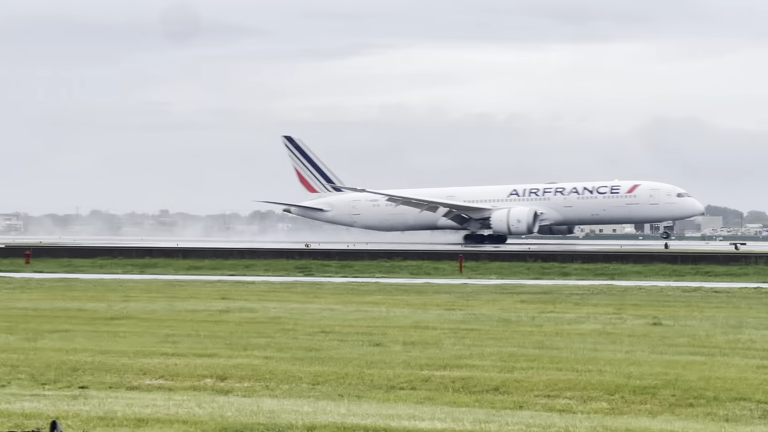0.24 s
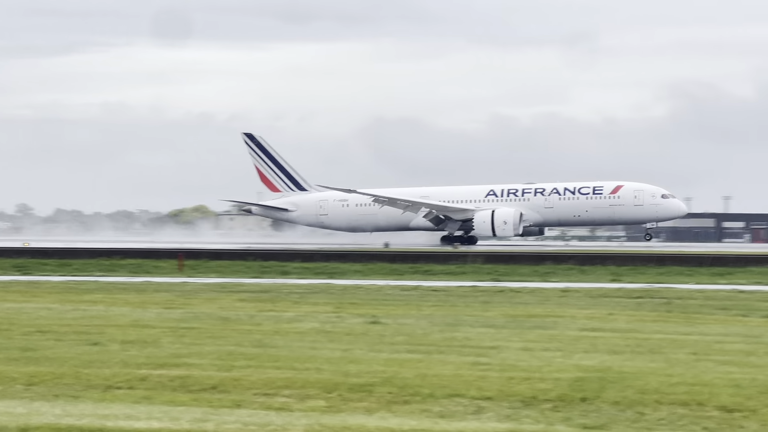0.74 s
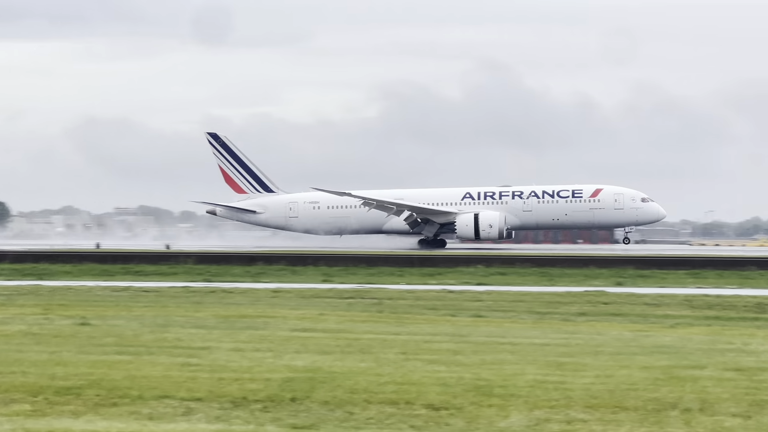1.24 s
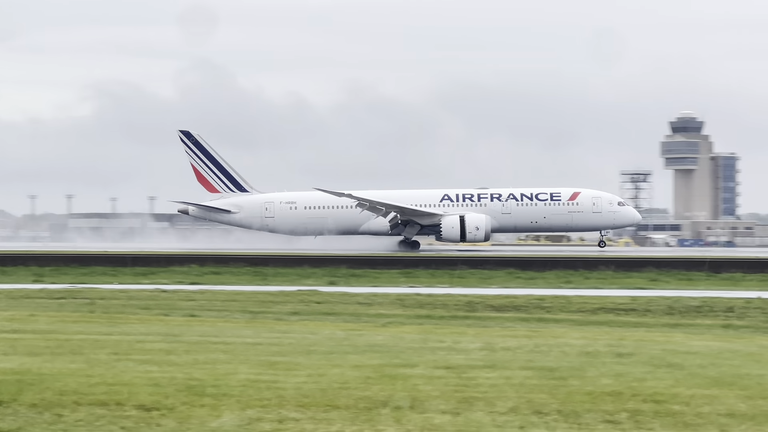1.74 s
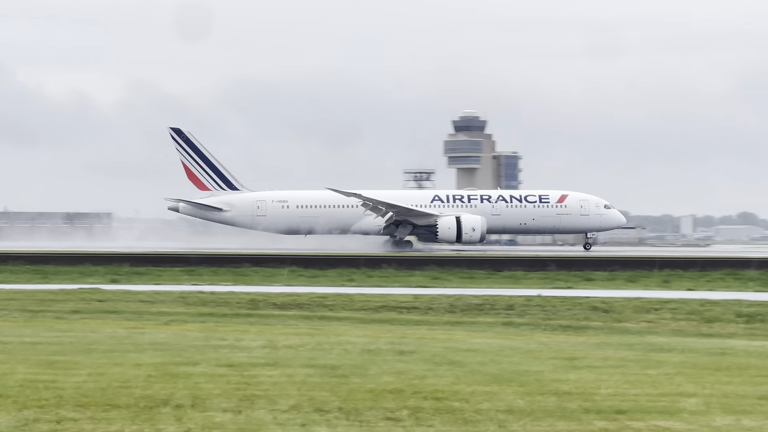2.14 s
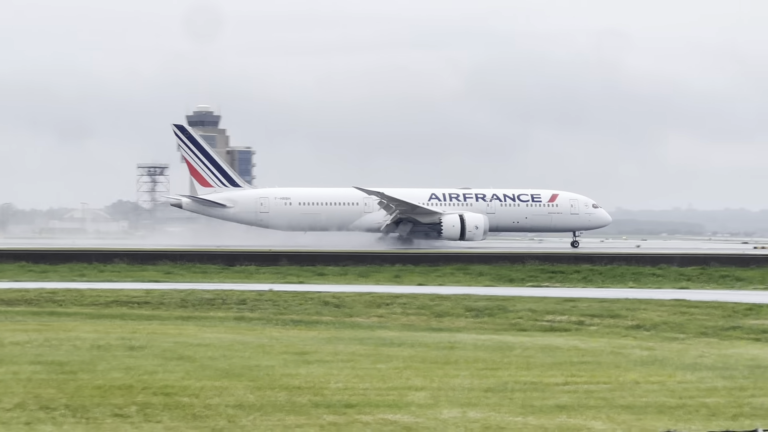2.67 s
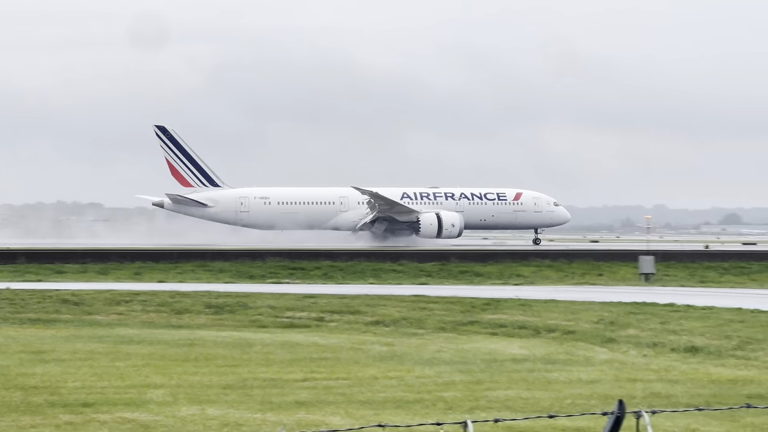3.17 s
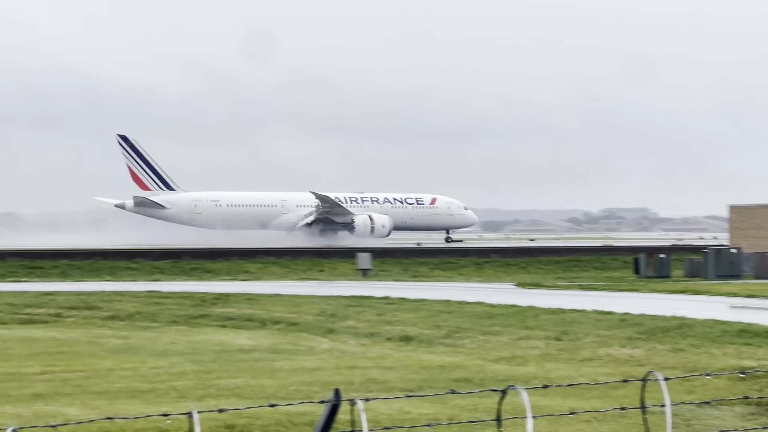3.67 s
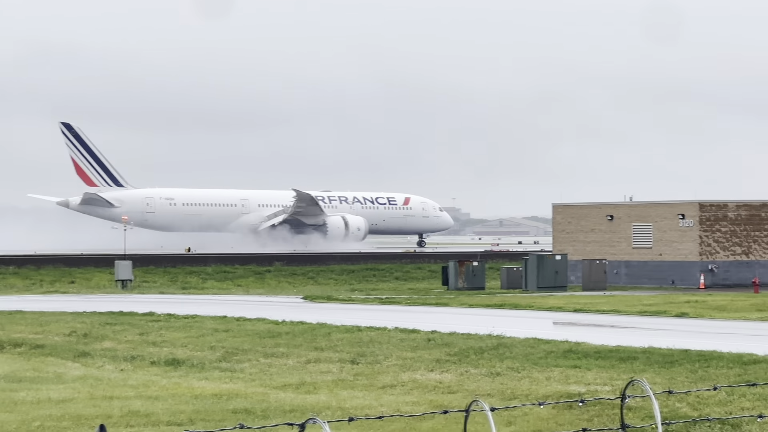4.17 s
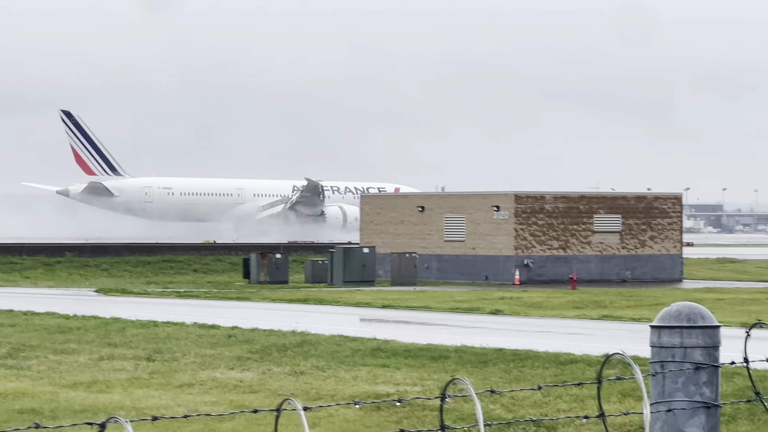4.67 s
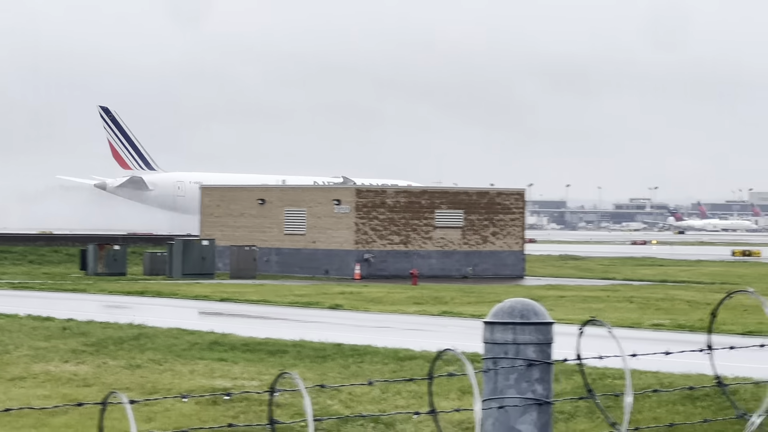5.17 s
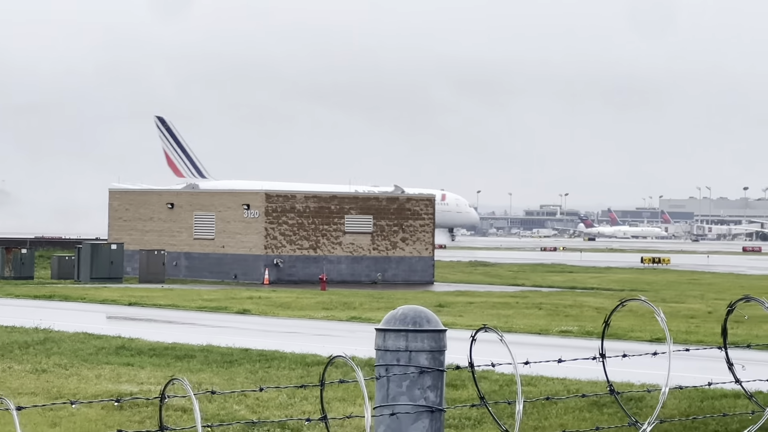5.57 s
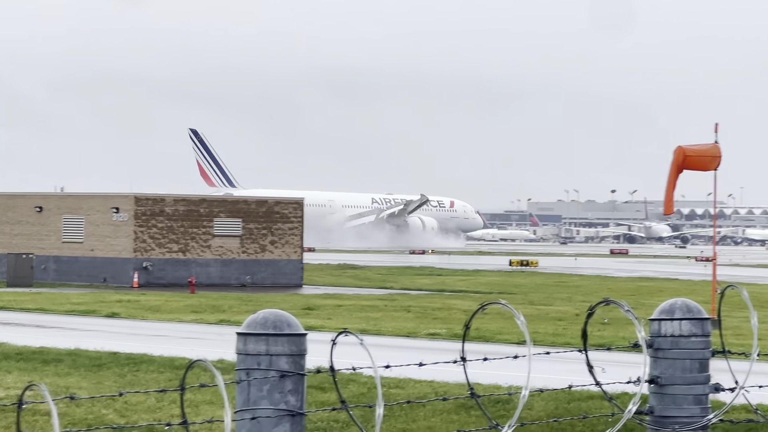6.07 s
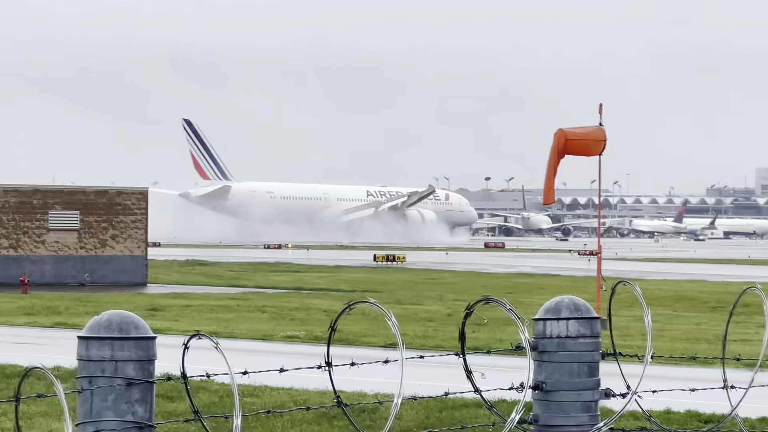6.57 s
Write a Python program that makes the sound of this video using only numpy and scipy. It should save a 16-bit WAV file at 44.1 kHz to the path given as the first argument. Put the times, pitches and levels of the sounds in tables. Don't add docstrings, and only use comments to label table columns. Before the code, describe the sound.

A large jet rolls out on a wet runway, heard across open grass by a camera in light rain. From 0 s a deep, heaving exhaust rumble and drone dominate, with a weaker roar and thin spray hiss fluttering in the air. Between 0.1 and 0.7 s a sleeve softly rubs the camera, hollow with a slight swish. Fine rain patters very quietly, with small sharp drop ticks, clearest near 0.2, 1.6 and 3.5 s. The engine dips around 1 s, then from about 2 s reverse thrust climbs quickly, becoming a broad, rough roar with brighter hiss by 3 s. It stays massive through 4 s and peaks near 5 s. A faint, wavering fan tone enters around 4.5 s. After 5.3 s the roar eases unevenly, the rain patter thins, and rumbling jet noise continues to the end at about 7 s.

```python
import sys
import numpy as np
from scipy import signal
from scipy.io import wavfile
from scipy.ndimage import uniform_filter1d

SR = 44100
rng = np.random.default_rng(int(sys.argv[2]) if len(sys.argv) > 2 else 0)


def level_to_linear(level):
    exponent = np.asarray(level, float) / 20
    return 10 ** exponent


def generate_wav(signal):
    frames = np.transpose(np.atleast_2d(signal))
    scaled = np.clip(frames, -1, 1) * 32767
    pcm = np.round(scaled).astype(np.int16)
    wavfile.write(sys.argv[1], SR, pcm)


N = 300762
SIZE, HOP = 2048, 256
HZ = np.fft.rfftfreq(SIZE, 1 / SR)
TIMES = np.arange(N // HOP + 5) * HOP / SR
CLOCK = np.arange(N) / SR
ABEAM_S = 3.92

# start_s, reverser_flow_db (below full), core_exhaust_db (below full),
# reverser_open (0 to 1)
THRUST = [(0, -23.5, -6, .6), (.45, -20.5, -7.5, 0), (.98, -15.5, -10, 0.4), (1.07, -15, -4.5, 0.4),
          (1.5, -16.5, -4, .5), (1.85, -16, -3, .7), (2.15, -9.5, -3.5, 0.7), (2.75, -5.5, -2, 0.79),
          (3.3, -2, 2.5, 0.89), (3.5, -1.5, 0, 0.9), (4.1, -1, 0.5, 0.85), (4.6, -0.5, 2, .8),
          (4.95, 1.5, 0.5, .9), (5.3, -1.5, -6.5, 0.8), (5.6, -3.5, -4.5, 1), (6.0, -6.5, -2, 0.4),
          (6.3, -4.5, -3.5, 0.3), (6.82, -7.5, -2.5, 0.3)]
# middle_s, length_s, roar_db, hiss_db
GUSTS = [(0.191, 0.078, 0, 6), (.4, .12, 0.2, -2), (0.692, 0.078, 0, 2.5), (.8, .1, 1.2, -2.5),
         (0.958, 0.045, 4, 2), (1.123, 0.12, 1, 2.5), (1.38, .1, 1.5, 3), (1.7, .3, -1, 1),
         (2.02, 0.14, 0.5, 2), (2.18, .18, 0.1, 2.5), (2.557, 0.25, -0.1, 2.5), (2.76, 0.11, -3, -1),
         (2.925, 0.19, 1.5, 1.5), (3.272, 0.14, 2.2, 3.5), (4.061, .1, -1.5, -1.5), (4.25, 0.22, 0.6, -0.2),
         (4.606, .1, 1.9, 1.5), (5.1, 0.7, 0.5, -0.9), (5.286, .08, 1.8, -1), (5.396, 0.087, .1, 1.5),
         (6.35, 0.37, -1.2, .7)]


def evened(x):
    return x / np.sqrt(np.mean(abs(x) ** 2) + 1e-30)


def read(points, hz):
    point_hz, value = np.transpose(points)
    return np.interp(np.log(hz + 1), np.log(point_hz + 1), value)


def follow(rows, column, t):
    return np.interp(t, [row[0] for row in rows], [row[column] for row in rows])


def bumps(rows, column, t):
    return sum(row[column] * np.exp(-(2 * (t - row[0]) / row[1]) ** 2) for row in rows)


def band(x, low_hz, high_hz):
    return signal.sosfilt(signal.butter(2, [low_hz, high_hz], "bandpass", fs=SR, output="sos"), x)


def blotches(width_hz, seconds):
    field = rng.standard_normal((len(TIMES), len(HZ)))
    field = uniform_filter1d(field, max(1, round(seconds * SR / HOP)), 0)
    field = uniform_filter1d(field, max(1, round(width_hz * SIZE / SR)), 1)
    return evened(field)


def noise():
    real, imaginary = rng.standard_normal((len(TIMES), len(HZ), 2)).T
    return (real + 1j * imaginary).T


def sound(spectra):
    return signal.istft(np.swapaxes(spectra, -1, -2), nperseg=SIZE, noverlap=SIZE - HOP)[1][..., :N]


def layer_level_db(layer, t):
    # full_thrust_db, reverser_flow_share, exhaust_share, turning_db_per_s (as the tail turns to us)
    layers = [
        (-14.5, 0.01, 1, 0.01),
        (-21, 0.092, 0.22, 0.87),
        (-20, 0.59, .05, 0.2),
        (-23.5, 1, 0.01, -0.01),
    ]
    # middle_s, length_s, rumble_db, drone_db
    heaves = [(.17, 0.069, 1, -0.5), (.72, 0.066, 4.5, 4), (1.21, .1, 0, -4), (1.39, 0.082, -1.5, 3.5),
              (1.8, .12, 2, -8), (2.07, .08, 5, -2), (2.24, .1, -1, -3.5), (2.36, .1, -1.5, 1),
              (2.71, .1, 1.5, -4.5), (3.17, 0.096, -5, -1), (3.28, .1, -0.5, -4), (3.93, 0.086, -2.5, -3),
              (4.03, .08, 1, 2.5), (4.25, 0.18, -3, 1.4), (4.54, 0.09, 2, 1.5), (4.8, 0.12, -2.5, 1.5),
              (5.15, 0.092, -6, 7), (5.24, 0.081, 6, -4.5), (5.39, .1, 3.5, 3), (5.72, 0.034, 3.5, 3),
              (6.2, 0.42, 0.5, -5.5), (6.3, 0.097, 4, -3.8), (6.5, 0.071, -5, -3.7)]
    full_db, flow, exhaust, turning_db = layers[layer]
    swells = heaves if layer < 2 else GUSTS
    swell_db = bumps(swells, column=2 + layer % 2, t=t)
    steady_db = flow * follow(THRUST, column=1, t=t) + exhaust * follow(THRUST, column=2, t=t)
    return full_db + steady_db + turning_db * (t - ABEAM_S) + swell_db


def ground_echo_db(width_octaves):
    dip_hz, turn_s, fall_hz_per_s, rise_hz_per_s = 358, 3.34, 12.7, 22
    dip_db, deepen_db_per_s = -10, -1.04
    falling_hz = fall_hz_per_s * np.maximum(turn_s - TIMES, 0)
    rising_hz = rise_hz_per_s * np.maximum(TIMES - turn_s, 0)
    octaves = np.log2((HZ + 1) / (dip_hz + rising_hz + falling_hz)[:, None])
    clear_s, clear_length_s, clear_db = 3.9, .9, -6.5
    taxiway_db = clear_db * np.exp(-(2 * (TIMES - clear_s) / clear_length_s) ** 2)
    depth_db = dip_db + taxiway_db + deepen_db_per_s * (TIMES - ABEAM_S)
    return depth_db[:, None] * np.exp(-(octaves / width_octaves) ** 2)


def drone_shape_db():
    # pitch_hz, level_db (per Hz)
    drone = [(82, -31.5), (140, -4), (200, -2.5), (264, -2), (316, -5), (390, -15), (550, -26), (920, -120)]
    base_db, per_exhaust, sway_db = -1.3, -.55, -0.9
    sway = evened(uniform_filter1d(rng.standard_normal(len(TIMES)), size=20))
    tilt_db = base_db + per_exhaust * follow(THRUST, column=2, t=TIMES) + sway_db * sway
    return read(drone, HZ) + tilt_db[:, None] * np.log2(np.clip(HZ, 120, 400) / 230)


def roar_shape_db():
    # pitch_hz, level_db (per Hz)
    open_roar = [(220, -31.5), (370, 3.5), (526, -4), (698, -3), (783, -7), (962, 0), (1170, 0.5),
                 (1350, -3), (1510, 0.5), (1830, -8), (2300, -17), (2990, -45), (5060, -120)]
    # pitch_hz, level_db (per Hz)
    shut_roar = [(220, -22.5), (370, -2.5), (542, 4), (650, -1.5), (770, -4.5), (1090, -4), (1300, -6.5),
                 (1490, -9.5), (1800, -12), (2300, -11.5), (2990, -40), (5060, -120)]
    opened = np.clip(follow(THRUST, column=3, t=TIMES), 0, 1)[:, None]
    return opened * read(open_roar, HZ) + (1 - opened) * read(shut_roar, HZ)


def hiss_shape_db():
    # pitch_hz, level_db (per Hz)
    hiss = [(1120, -18), (1900, -5.5), (2240, -5.5), (2560, -0.5), (2790, -2.5), (3100, -1.5), (4450, -9.5),
            (5110, -11), (7650, -24), (8500, -31.5), (9200, -44), (12000, -92.5), (20200, -120)]
    distance_db = 0.78 * (TIMES - ABEAM_S)
    flow_db = 0.19 * follow(THRUST, column=1, t=TIMES)
    gust_db = 0.34 * bumps(GUSTS, column=3, t=TIMES)
    return read(hiss, HZ) - (distance_db - flow_db - gust_db)[:, None] * (HZ / 8000) ** 2


def jet():
    # pitch_hz, level_db (per Hz)
    rumble = [(15, -45.5), (25, -13), (46, -15), (58, 3), (70, 5.5), (85, 2), (120, -1), (150, -7.5),
              (190, -8), (250, -42.5), (420, -120)]
    # pitch_hz, left_minus_right_db
    lean_points = [(60, 0), (130, -.5), (280, -1), (410, 0), (600, -3), (880, -1.5), (1290, -2),
                   (1890, -.5)]
    # pitch_hz, level_db
    diffuse = [(30, -36), (100, -24), (300, -21.5), (700, -15), (1500, -25), (2500, -29), (3600, -33),
               (5000, -53.5), (6600, -52), (7300, -24.5), (9000, 8)]
    dip = level_to_linear(ground_echo_db(width_octaves=0.22))
    shapes_db = (read(rumble, HZ), drone_shape_db(), roar_shape_db(), hiss_shape_db())
    power = 0
    for k, shape_db in enumerate(shapes_db):
        layer = level_to_linear(shape_db) * dip
        layer = layer / np.sqrt((layer ** 2).sum(1, keepdims=True))
        power = power + (layer * level_to_linear(layer_level_db(k, TIMES))[:, None]) ** 2
    shake = HZ / (HZ + 2500)
    fast_db = 0.87 * shake * blotches(width_hz=6000, seconds=.04)
    slow_db = 1.0 * shake * blotches(width_hz=500, seconds=0.17)
    shared = noise()
    stray = level_to_linear(read(diffuse, HZ)) * noise()
    lean = level_to_linear(read(lean_points, HZ) / 2 * (HZ < lean_points[-1][0] * 1.3))
    ears = np.array([(shared + stray) * lean, (shared - stray) / lean])
    out = sound(ears * np.sqrt(power) * level_to_linear(fast_db + slow_db))
    return out / np.sqrt(np.mean(out.mean(0) ** 2)) * np.sqrt(power.sum(1).mean())


def steadied(x, grip):
    low = signal.sosfiltfilt(signal.butter(2, 150, fs=SR, output="sos"), x)
    smooth_power = uniform_filter1d(uniform_filter1d(low.mean(0) ** 2, size=2400), size=2400)
    level = np.sqrt(abs(smooth_power) + 1e-9)
    swell = level_to_linear(layer_level_db(layer=0, t=CLOCK))
    return x + low * ((swell / level) ** np.clip(grip, 0, 1) - 1)


def patter(white):
    # middle_s, length_s, level_db
    rustles = [
        (.2, .08, 5),
        (.31, .08, 6),
        (1.68, .12, 4),
        (3.2, .4, 3),
        (3.59, .12, 8),
        (5.06, .08, 6),
        (5.71, .08, 8),
    ]
    base_db, thrust_share, shelter_s, shelter_db = -71, .2, 5.5, -11
    shelter = np.clip((CLOCK - shelter_s) / .8 + .5, 0, 1)
    flicker = evened(uniform_filter1d(white, size=400))
    thrust_db = thrust_share * follow(THRUST, column=1, t=CLOCK)
    shower_db = bumps(rustles, column=2, t=CLOCK)
    return level_to_linear(base_db + thrust_db + shelter_db * shelter + shower_db + 1.5 * flicker)


def drops():
    # start_s, peak_db
    hits = [(0.236, -46.5), (0.28, -59.5), (0.3044, -59.5), (0.3294, -55), (0.369, -60), (0.631, -51.5),
            (0.7751, -60), (0.993, -59), (1.03, -57), (1.301, -59), (1.6272, -47.5), (1.671, -52.5),
            (1.6916, -57.5), (1.73, -62.5), (2.2169, -52), (2.5194, -61), (2.7796, -60), (3.2334, -61),
            (3.5114, -58), (3.5299, -41), (3.5444, -64), (3.5753, -51), (3.5947, -46.5), (3.64, -56),
            (4.344, -62), (5.045, -58.5), (5.0594, -54.5), (5.7139, -61), (5.73, -60), (6.5286, -53)]
    t = np.arange(1200) / SR
    fade = level_to_linear(-60 * t / .005) + .12 * level_to_linear(-60 * t / .07)
    ticks = np.zeros((2, N + len(t)))
    for (start_s, peak_db), spray in zip(hits, rng.standard_normal((len(hits), 3, len(t)))):
        at = round(start_s * SR)
        ticks[:, at:at + len(t)] += level_to_linear(peak_db + 5.5) * (spray[0] + .5 * spray[1:]) * fade
    return ticks[:, :N]


def rain():
    # pitch_hz, level_db
    drizzle = [(4000, -42), (6000, -2), (9400, 0.5), (11400, -2), (12500, -1.5), (15000, -8), (15600, -9.5),
               (16000, -59)]
    taps = signal.firwin2(255, HZ, level_to_linear(read(drizzle, HZ)) * (HZ < HZ[-1]), fs=SR)[None]
    white = rng.standard_normal((4, N))
    fine = evened(signal.oaconvolve(white[0] + 1.2 * white[1:3], taps, "same", axes=1))
    return fine * patter(white[3]) + signal.oaconvolve(drops(), taps, "same", axes=1)


def brushes():
    # start_s, length_s, ring_hz, ring_db, swish_db
    strokes = [
        (0.08, 0.17, 1416, -40, -70),
        (0.14, 0.084, 1690, -41, -61),
        (0.256, .1, 1510, -45, -62),
        (.6, 0.11, 1490, -51, -74),
    ]
    white = rng.standard_normal((3, N))
    out = np.zeros((2, N))
    swish = evened(band(band(white[0] + .4 * white[1:], 5500, 8800), 5500, 8800))
    for start_s, length_s, ring_hz, ring_db, swish_db in strokes:
        stroke = np.sin(np.pi * np.clip((CLOCK - start_s) / length_s, 0, 1))
        ring = evened(band(white[0], ring_hz * .97, ring_hz * 1.03))
        out += stroke * (level_to_linear(ring_db) * ring + level_to_linear(swish_db) * swish)
    return out


def fan():
    fan_hz, start_s, start_db, fade_db_per_s = 537, 4.45, -32.5, 3
    wobble, patchy = (evened(uniform_filter1d(v, size=4000)) for v in rng.standard_normal((N, 2)).T)
    turns = np.cumsum(fan_hz + 6.0 * wobble) / SR
    fade_in = np.clip((CLOCK - start_s) / 0.11, 0, 1)
    tone_db = start_db - fade_db_per_s * (CLOCK - start_s) + 4.0 * patchy
    tone = np.sqrt(2) * level_to_linear(tone_db) * fade_in * np.sin(2 * np.pi * turns)
    return tone * level_to_linear([[-1.5], [1.5]])


def scene():
    return steadied(jet(), grip=0.54) + rain() + brushes() + fan()


def top_cut(x):
    return signal.sosfilt(signal.butter(12, 15800, fs=SR, output="sos"), x)


def record(dry):
    cut_hz, gap_hz = 42, (9800, 10850)
    wind_cut = signal.sosfilt(signal.butter(3, cut_hz, "highpass", fs=SR, output="sos"), dry)
    limited = 1.525 * np.tanh(wind_cut / 1.47)
    gapped = signal.oaconvolve(limited, signal.firwin(201, gap_hz, fs=SR)[None], "same", axes=1)
    return top_cut(gapped)


dry = scene()
out = record(dry)
generate_wav(out)
```